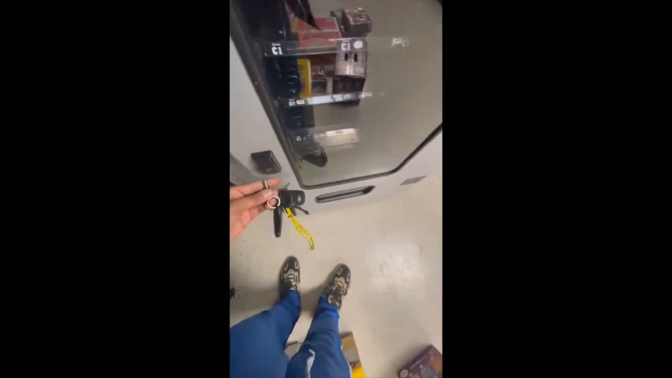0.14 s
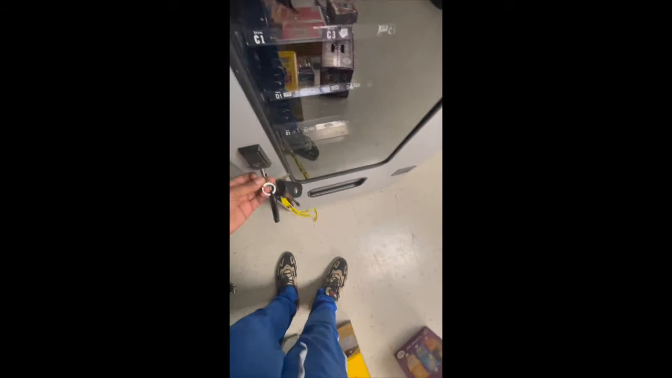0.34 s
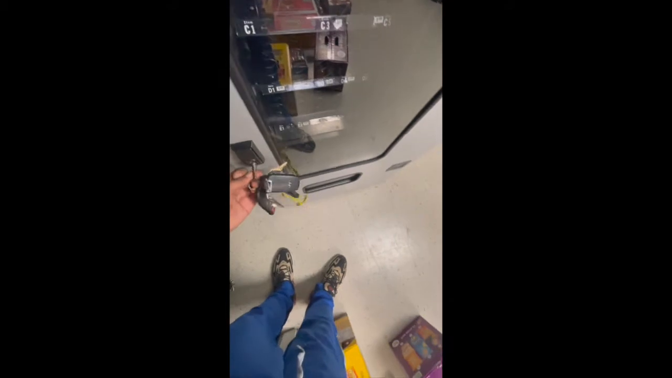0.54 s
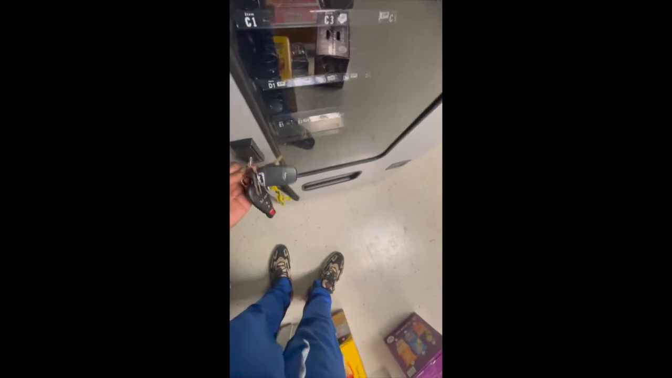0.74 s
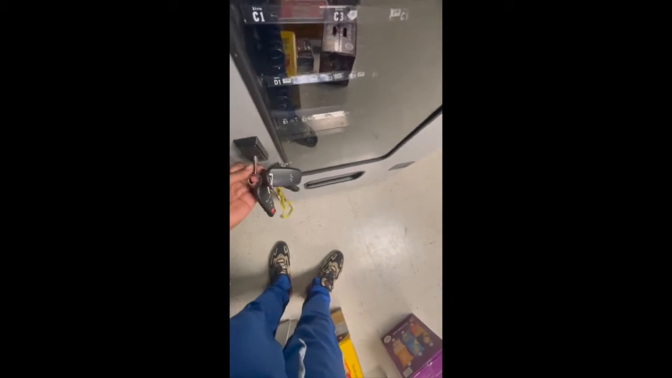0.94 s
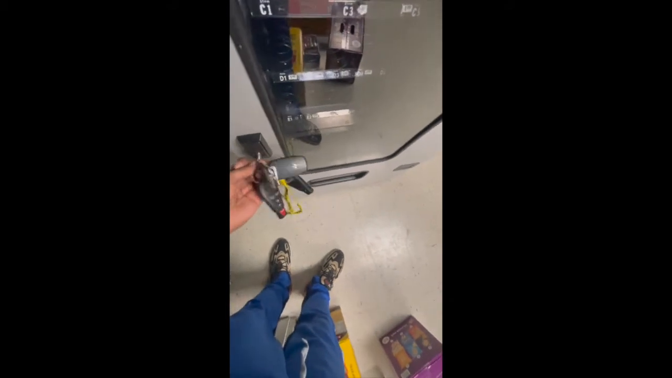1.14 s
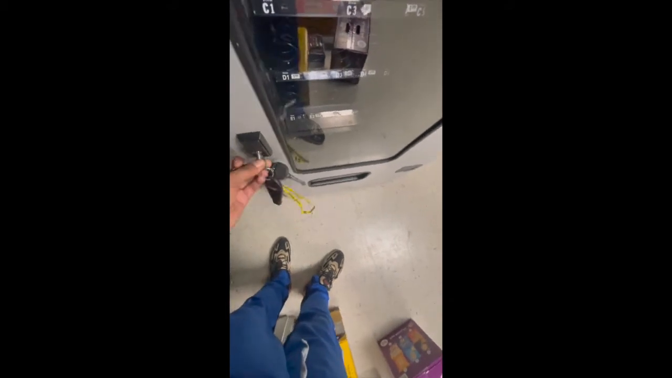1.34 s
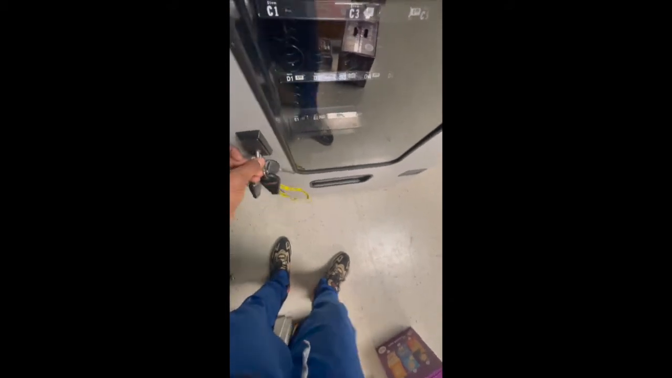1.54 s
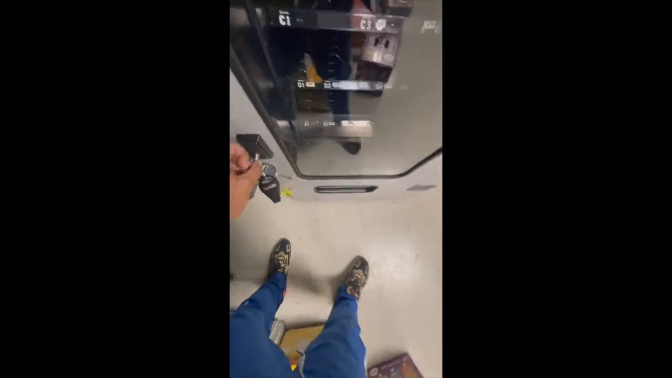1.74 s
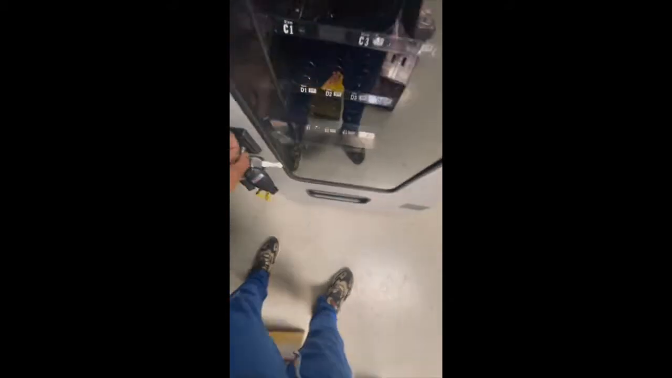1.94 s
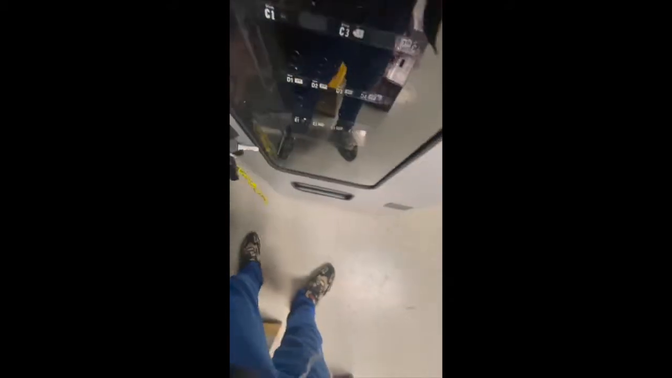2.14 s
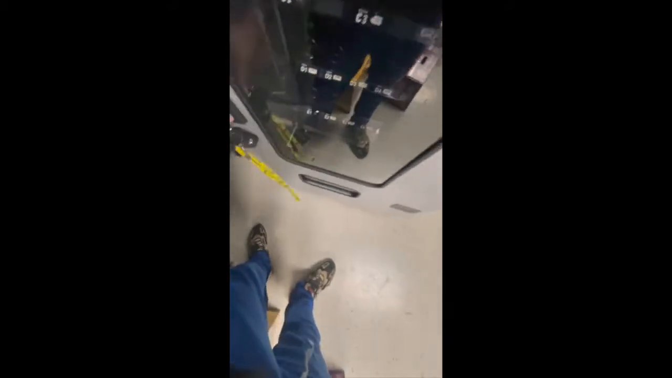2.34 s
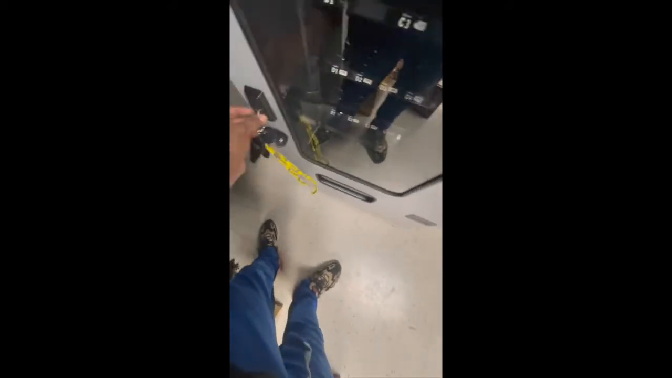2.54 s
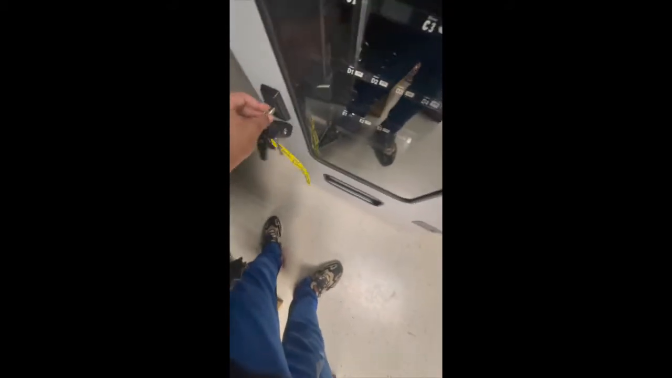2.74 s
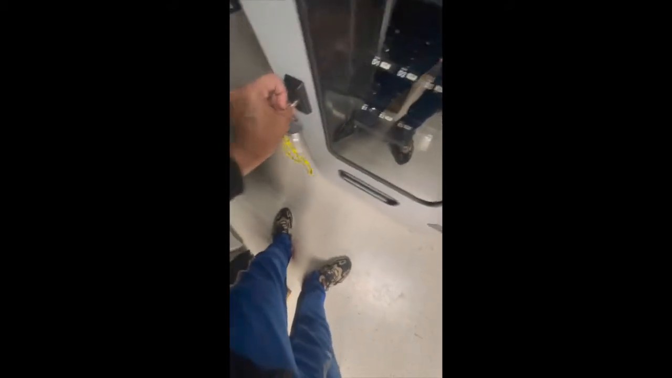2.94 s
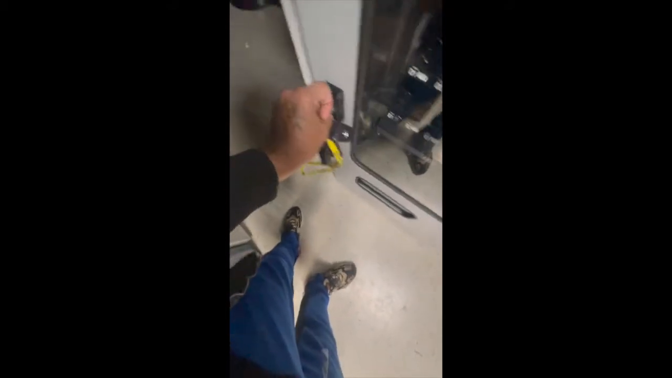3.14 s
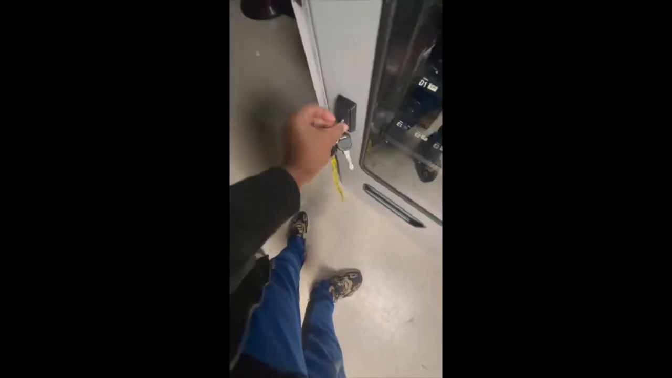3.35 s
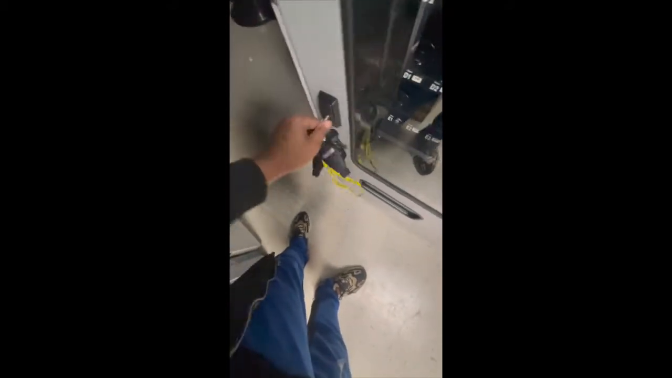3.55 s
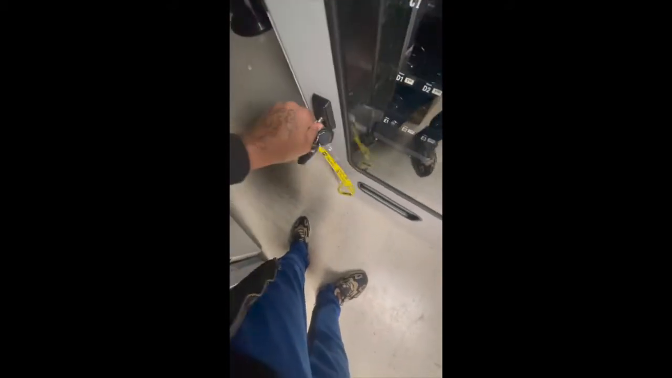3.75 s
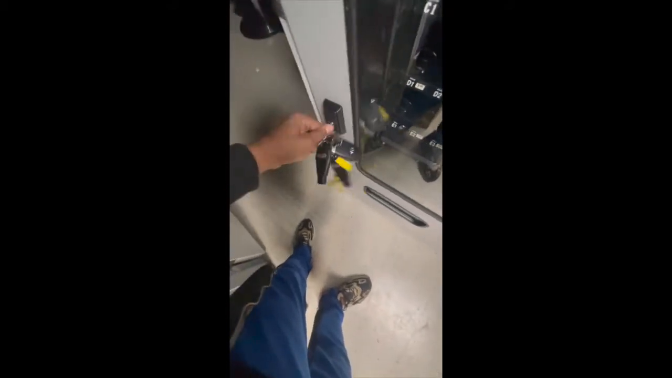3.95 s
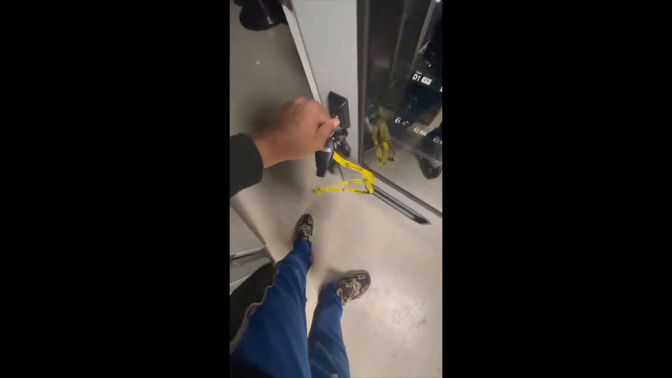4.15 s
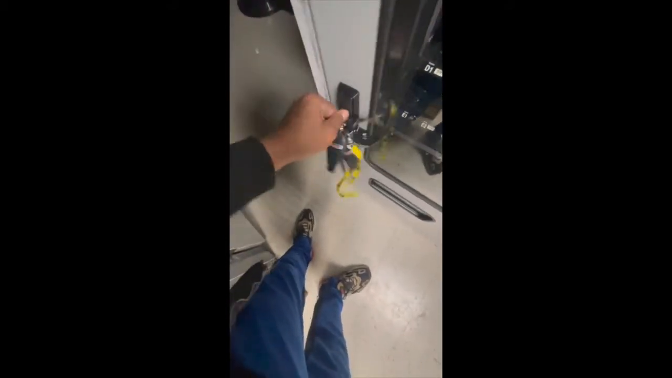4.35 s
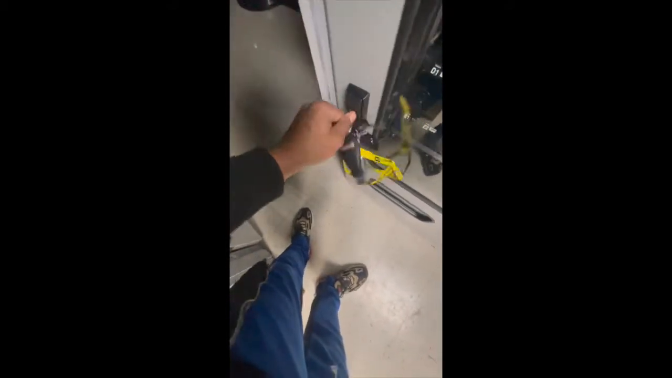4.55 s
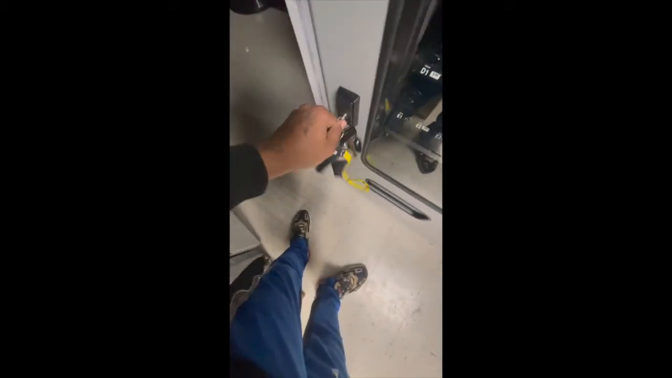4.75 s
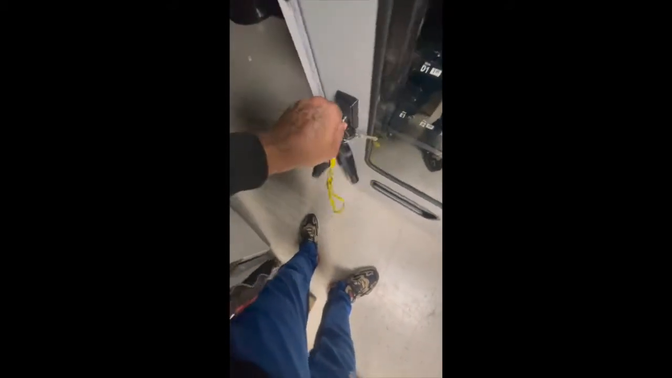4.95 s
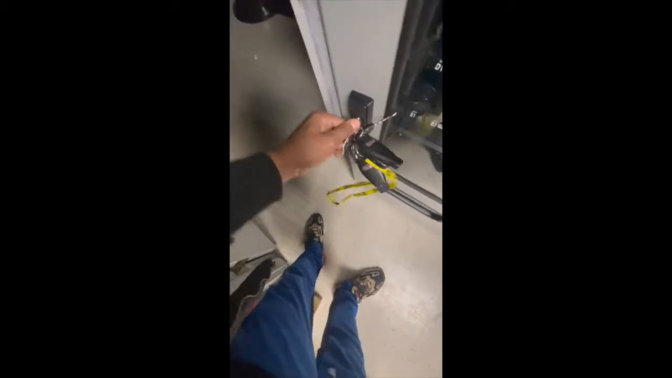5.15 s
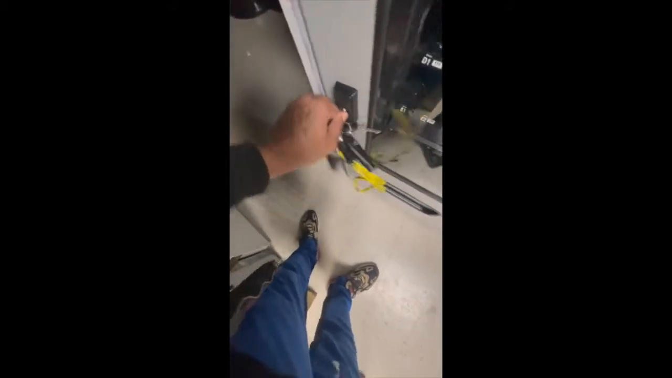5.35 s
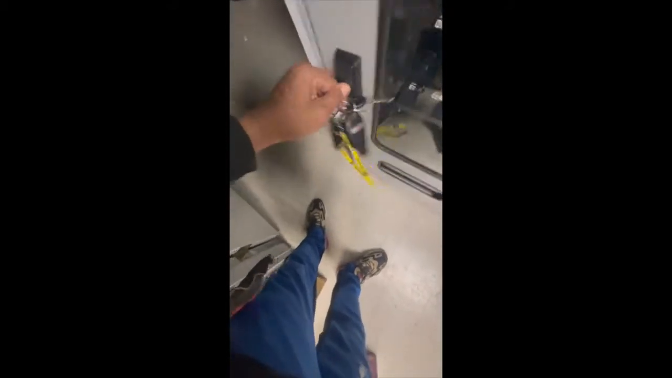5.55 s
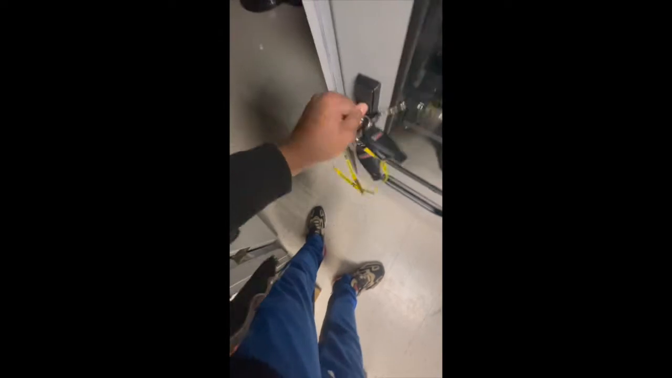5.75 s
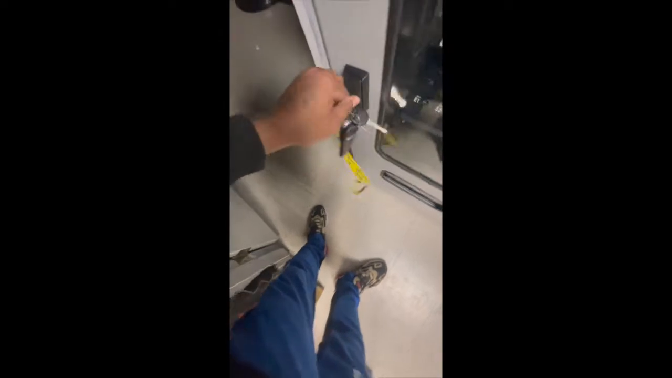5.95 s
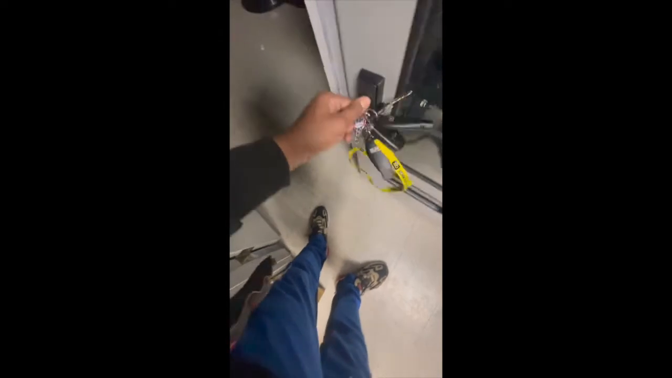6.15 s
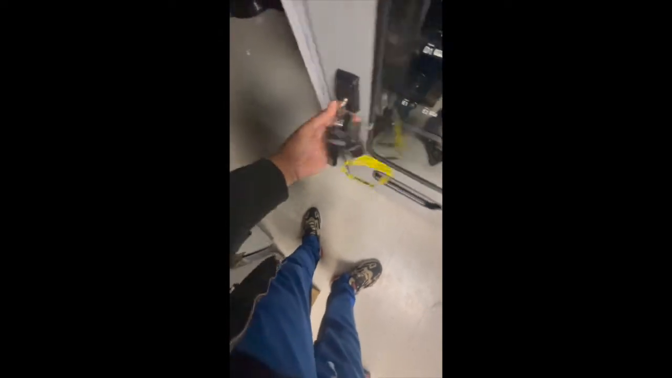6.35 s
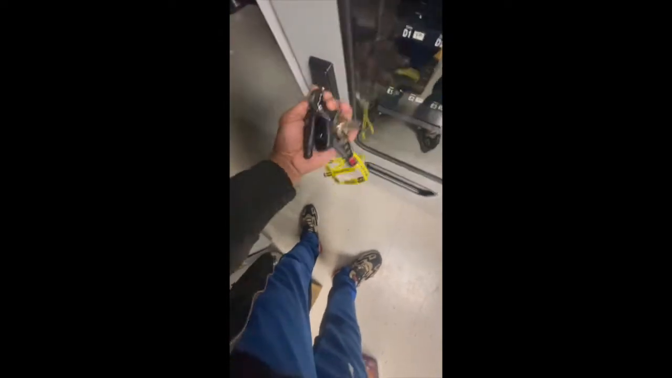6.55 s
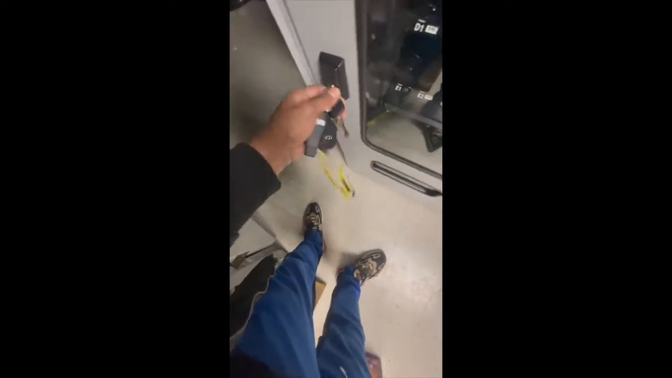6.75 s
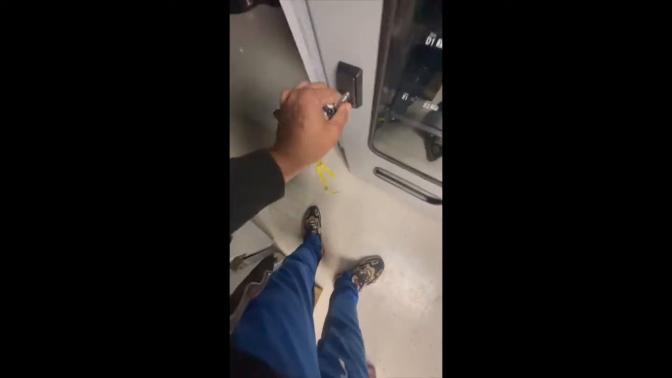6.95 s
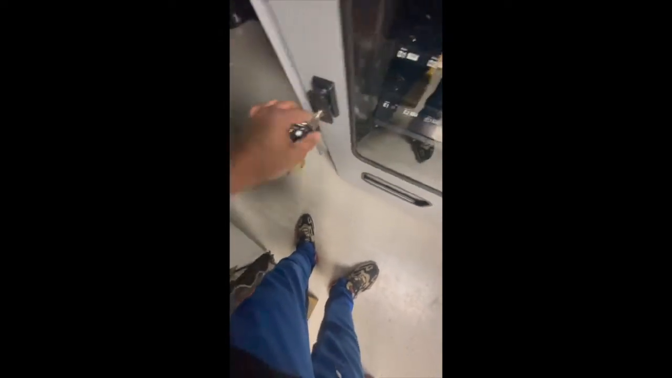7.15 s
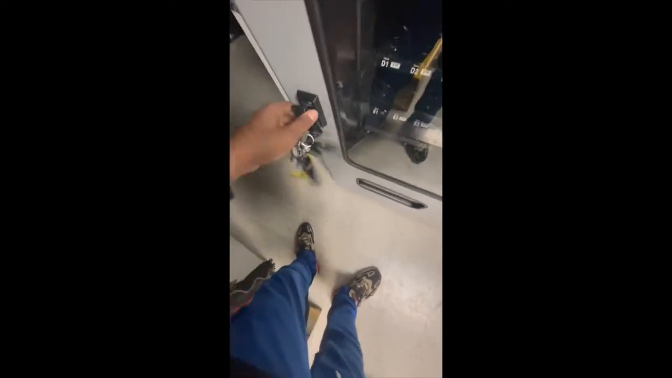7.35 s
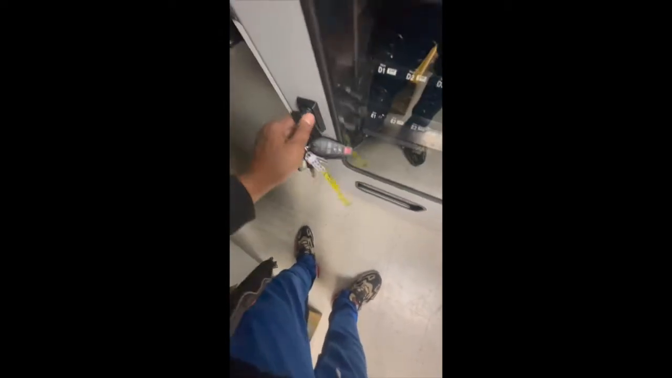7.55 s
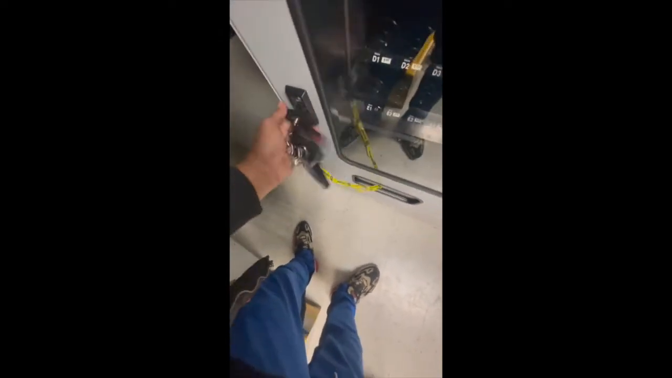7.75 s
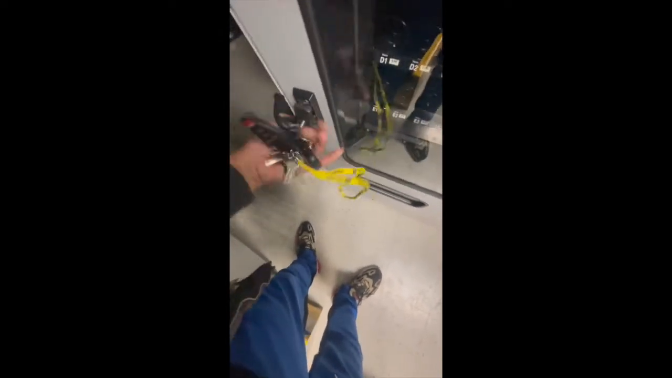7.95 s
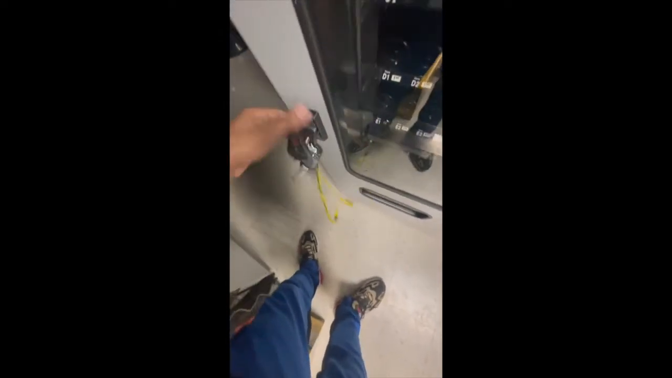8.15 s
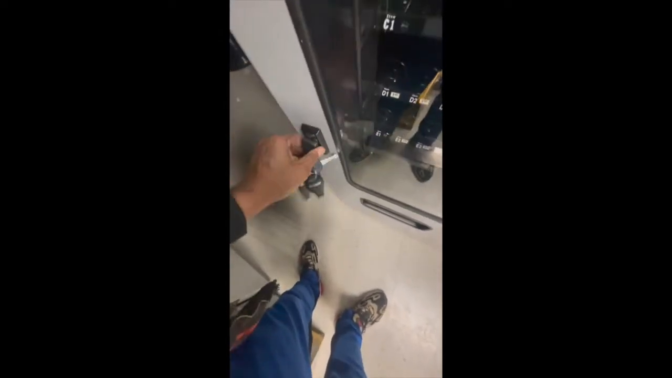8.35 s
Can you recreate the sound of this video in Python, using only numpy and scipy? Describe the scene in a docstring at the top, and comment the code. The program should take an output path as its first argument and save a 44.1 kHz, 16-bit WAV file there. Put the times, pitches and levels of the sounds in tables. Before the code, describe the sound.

A close stereo microphone picks up keys being fitted and turned in the lock of a hollow steel cabinet. Light clinks and faint taps come first, then busier rattles and dull door thumps, two stronger clunks, and finally sharp, bright jingling. A short room echo and steady bass hum surround it.

```python
"""First a light clink of keys over a low hum, then rattles, clacks and booms: a bunch of keys is pushed
into the lock of a vending machine and turned, heard from close by.
Keys are short noise bursts and damped tones; the lock barrel and hollow steel door are resonators
driven by blows and many small contacts; the cabinet is one wandering low tone. Two thin high tones
flicker late on. Decaying noise tails give the room's answer, and uneven coloured noise its hum."""
import sys
import numpy as np
from scipy import signal
from scipy.fft import rfft, irfft, next_fast_len
from scipy.io import wavfile
from scipy.ndimage import uniform_filter1d, map_coordinates

SR = 44100
rng = np.random.default_rng(int(sys.argv[2]) if len(sys.argv) > 2 else 0)


def wrap_up_sound(samples):
    """Save the sound to the file named by the first command line argument, as 16-bit audio."""
    columns = np.atleast_2d(samples).T
    # keep every value between -1 and 1, then stretch to whole-number steps
    tamed = np.clip(columns, -1, 1)
    steps = np.round(tamed * 32767).astype(np.int16)
    wavfile.write(sys.argv[1], SR, steps)


N = 374585
TIME = np.arange(N) / SR

# key contacts: (time [s], nominal clink level [dB], loudest key pitch [Hz],
# bright edge re clink [dB], barrel clack re clink [dB])
CONTACTS = [(0.022, -30, 5470, -7, -37), (0.3981, -28, 2540, -32, -12.5), (0.5896, -35, 2580, -9, -26),
            (0.6851, -22.5, 5350, -2.5, -6.5), (0.713, -19, 3880, -16, -10), (0.9808, -32, 3100, -37, -20),
            (1.083, -38.5, 2800, -28, 2), (1.192, -36.5, 5320, -4, -12), (1.415, -38, 2390, 0, -0.5),
            (1.523, -38.5, 2410, -32, 1.5), (2.021, -32.5, 2610, -21, -2), (2.2689, -24, 3210, -10, -10),
            (2.298, -31.5, 2480, -24, -16), (2.712, -30, 2430, -5, 2), (2.877, -34, 4800, -29, 0.5),
            (3.194, -17.5, 3220, -7, -6.5), (3.373, -24, 3210, -40, -9), (3.411, -33, 3260, 5, 2),
            (3.478, -27.5, 5420, -2, -26), (3.601, -32, 6800, 2, -24), (3.7289,  -28, 2120, -26, -2),
            (3.775, -28, 4400, -23, -21), (3.8383, -26, 2150, -30, -4.5), (3.896, -19.5, 3410, -33.5, -9),
            (3.965, -32, 5700, 6, -25), (4.095, -27, 2270, 1, -1), (4.2043, -19.5, 2400, -22, -12),
            (4.2885, -20, 2860, -34, -7), (4.3891, -27, 5440, 4.5, -31), (4.533, -25.5, 5510, 3.5, -35),
            (4.764, -26.5, 5480, -4, -12.5), (4.948, -25, 5100, -5, -5), (4.9604, -12, 2130, -8.5, -9.5),
            (5.041, -17, 3100, -19, -9), (5.24, -30.5, 5240, 3.5, 1), (5.3887, -42, 1960, -25, 17.5),
            (5.5255, -22.5, 3260, -19, -9), (5.737, -29.5, 1840, -36, 4), (5.8611, -19.5, 3010, -32, -2),
            (5.907, -24, 4970, 1, 1), (5.998, -25.5, 2480, -6, -19), (6.0694, -14, 6450, -3, -10.5),
            (6.195, -34.5, 2110, 10, 3), (6.248, -25.5, 5180, 3.5, -17), (6.2983, -32, 5440, -5, -30),
            (6.355, -30, 3640, 3, -15), (6.468, -28, 3400, 8, -6), (6.5875, -30, 6300, 8.5, -30),
            (6.751, -23.5, 1940, -34, -10.5), (6.9647, -12, 3600, 1, -8.5), (6.97, -6.5, 1960, -15, -16),
            (6.979, -26, 3780, -16, 0), (6.99, -17.5, 3660, -14, 0.5), (7.0844, -29, 3380, -26, 4.5),
            (7.167, -26.5, 1920, -30, -1.5), (7.31, -9, 5400, -6, -31), (7.3595, -10.5, 5650, -7, -39),
            (7.3751, -14.5, 5500, -10, -33), (7.428, -19.5, 5970, 3, -10), (7.453, -22.5, 4260, 2, -10),
            (7.592, -18, 1870, -13, -17), (7.708, -26.5, 3660, 11.5, -5.5), (7.8347, -25, 5100, 4, -36),
            (7.914, -44, 2280, -9, 8), (7.9326, -18.5, 2350, 2, -3.5), (7.961, -20, 5500, 0, -24),
            (7.977, -19.5, 5580, 4, -29), (8.0444, -23, 5650, 0, -6), (8.1096, -12.5, 4430, -19, -6.5),
            (8.154, -22, 5100, 1, -4), (8.199, -28, 2090, 3.5, -25), (8.269, -16, 5600, -7, -14),
            (8.294, -22, 3040, 2, -3), (8.373, -34, 5400, -1, 3)]
# blows on the door: (time [s], nominal panel level [dB], lock plate re panel [dB],
# cabinet boom rms re panel [dB], favoured pitch [Hz])
BLOWS = [(0.398, -31, -20, -21, 241), (0.691, -23.5, -15, -4.5, 212), (0.711, -24, -7.5, -10, 250),
         (0.982, -46.5, 8, -11.0, 240), (1.079, -33, 5.5, -6, 239), (1.522, -33, 1, -26.0, 186),
         (1.749, -32.5, -5.5, -6.0, 170), (1.846, -47.5, 7, -21, 140), (2.096, -46.5, 2.5, -18.0, 180),
         (2.269, -34.5, -7.5, -17, 368), (2.298, -28.5, -35, -21.0, 280), (2.693, -25.5, -12, -2, 241),
         (2.724, -26.5, -11.5, -21, 305), (2.876, -41, 5.5, -15.0, 220), (2.906, -27, -8, -2.5, 150),
         (3.105, -25.0, -20, -12, 255), (3.193, -26, -3, -19.0, 284), (3.229, -34.5, -19.0, 5.5, 310),
         (3.404, -28.5, 1, -13, 253), (3.732, -24.0, -1.5, -15, 234), (3.837, -25.5, -7.5, -10, 243),
         (4.093, -19, -5.5, -9, 294), (4.205, -17.5, -14.5, -4.5, 272), (4.292, -21, -27.0, -8.5, 262),
         (4.55, -25.5, -28, -8.0, 270), (4.586, -24, -15, -27, 322), (4.818, -23.5, -13, -30.0, 270),
         (4.961, -8.5, -19.5, -12.5, 160), (5.039, -10, -24, -14.0, 222), (5.263, -18.5, -16.5, -10, 158),
         (5.396, -15.5, -23, 0, 224), (5.739, -25.5, -10, -16, 334), (5.828, -39.5, -30.0, 19.5, 168),
         (5.861, -22.5, -33.0, -11, 239), (5.985, -22, -32, -24.0, 222), (6.067, -23, -24, -19, 244),
         (6.718, -27.5, -24, -2, 220), (6.747, -21.5, -42, -19.0, 312), (6.963, -14, -35, 0, 327),
         (6.98, -17, -10.5, -22, 280), (6.995, -9.5, -30, -37, 267), (7.038, -20, -34.0, -19.0, 300),
         (7.064, -21.0, -23.0, -23, 297), (7.124, -27.0, -15, -13.0, 220), (7.215, -41, -16, 17.5, 280),
         (7.361, -16.0, -12.5, -22, 380), (7.464, -17, -13.5, -29.0, 190), (7.594, -20.5, -35, 6.5, 179),
         (7.852, -31.5, -33, 8.5, 180), (7.924, -21.5, -23.0, -3, 270), (7.963, -25.5, -22.0, -16, 240),
         (8.105, -21, -25.0, -4, 140), (8.294, -20, -37, 0.5, 244)]
# the hand working the key: (time [s], door shake [dB], barrel grind [dB])
HAND = [(0.0, -55.5, -76), (0.92, -42.5, -61), (1.44, -57.5, -53.5), (1.87, -49, -57), (2.51, -49, -58.5),
        (3.28, -42, -55), (4.28, -47, -52.5), (4.56, -41.5, -79), (5.2, -40.5, -60), (5.89, -37.5, -56),
        (6.69, -44, -66), (6.9, -40.5, -55), (7.23, -35.5, -46), (7.9, -43.5, -72), (8.13, -34.5, -52),
        (8.49, -44.5, -62)]
# body spectrum of a key contact: (frequency [Hz], relative density [dB per Hz])
CLINK_SPECTRUM = [(1200, -1), (2200, 2.5), (4000, 3.5), (6000, 2), (7500, -18), (12000, -39)]
# bright edge of a key contact: (frequency [Hz], relative density [dB per Hz])
EDGE_SPECTRUM = [(4500, -17.5), (6500, 4), (9000, -0.5), (12000, -3.5), (15900, 1), (16200, -39),
                 (17200, -50)]
# resonances of the lock barrel: (frequency [Hz], width [Hz], relative level [dB])
BARREL_MODES = [(1158, 170, 6.5), (1438, 94, 5.5), (1784, 490, -1)]
# resonances of the steel around the lock: (frequency [Hz], width [Hz], relative level [dB])
PLATE_MODES = [(610, 60, 9), (735, 65, 11), (1020, 180, 1)]


def key_contacts():
    """Impact excitation: a short contact has a broad spectrum; bouncing prolongs it and drives the barrel."""
    s, db, _, edge_db, clack_db = np.transpose(CONTACTS)
    bounce = chatter(250, 5.8)
    crack_hit = bursts(s, db + 1.0, 0.0016, size=6)
    crack_bounce = bounce * bursts(s, db - 14.5, 0.064, size=60)
    crack = filtered(crack_hit + crack_bounce, colour(CLINK_SPECTRUM))
    edge_hit = bursts(s, db + edge_db + 5.5, 0.0027)
    edge_bounce = bounce * bursts(s, db + edge_db - 12.0, 0.087, size=60)
    edge = filtered(edge_hit + edge_bounce, colour(EDGE_SPECTRUM))
    clack = filtered(bounce * bursts(s, db + clack_db - 5.5, 0.1, size=60), modes(BARREL_MODES))
    return crack + edge + clack


def key_rings():
    """Free vibration: a struck key rings at its own pitch, and a neighbour answers at another."""
    s, db, hz, _, _ = np.transpose(CONTACTS)
    late, ratio = rng.random((len(s), 2)).T
    struck = pings(s, db - 2.5, hz, t60=0.025, rough=0.19)
    neighbour_hz = hz * (.6 + 1.2 * ratio)
    neighbour = pings(s + .006 * late, db - 6.5, neighbour_hz, t60=0.017, rough=0.18)  # up to 6 ms later
    return struck + neighbour


def key_rattle():
    """Superposed random impacts: shaking sets the level, and harder shaking is brighter."""
    # how hard the bunch of keys is shaken: (time [s], relative rattle level [dB])
    shaking = [(0.0, -45), (0.2, -79), (0.8, -51.5), (1.03, -70), (1.24, -55), (1.37, -62.5), (1.51, -71.5),
               (2.67, -59.5), (3.22, -61.5), (3.45, -52.5), (4.66, -50), (4.94, -50), (5.56, -50),
               (5.82, -56), (6.22, -44.5), (6.41, -38.5), (6.6, -56), (6.83, -53.5), (7.4, -46), (7.8, -46),
               (8.06, -33), (8.16, -37.5), (8.39, -41.5), (8.49, -50.5)]
    s, db = np.transpose(CONTACTS)[:2]
    after_db, after_s = -29.5, 0.079  # shaking left by a clink: level re clink, t60
    shake = curve(shaking, column=1) + dying(s, db + after_db, after_s, size=400)
    contacts = chatter(45, 5.5) * crowd(450, 3.6, 0.003)
    rattle = amp(-4.5) * filtered(contacts, colour(CLINK_SPECTRUM))
    rattle += amp(11.5) * shake ** 0.29 * filtered(contacts, colour(EDGE_SPECTRUM))
    return shake * (rattle + amp(-5.0) * jangle(count=1800))


def jangle(count):
    """Modal excitation: small random contacts each ring one mode of one key."""
    # key modes: (frequency [Hz], relative level [dB], t60 [s])
    key_modes = [(3643, -1, 0.085), (5640, 5.5, 0.073), (6450, -1, 0.024), (9300, 0.5, 0.027),
                 (10360, 1.5, 0.036)]
    when, which, size, off = rng.random((count, 4)).T
    hz, db, t60 = np.array(key_modes)[(which * len(key_modes)).astype(int)].T
    pitch_hz = hz * (1 + .14 * (off - .5))  # within 7 percent of the mode
    return unit(pings(when * TIME[-1], db + 14 * size, pitch_hz, t60[:, None], rough=0.16))


def thin_tones():
    """Thin flickering tones: two brief high tones of wandering phase swell and stop."""
    # thin high tones: (time [s], pitch [Hz], relative level [dB], time scale of the swell [s])
    tones = [(7.826, 7550, -22, .022), (8.363, 7700, -27, .02)]
    out, t = np.zeros(N + SR), TIME[:SR // 10]
    for s, hz, db, length in tones:
        u = t / length
        swell = u * np.exp(-u * u * u)
        drift = 0.025 * np.cumsum(rng.standard_normal(len(t)))  # phase [rad]
        out[round(s * SR):][:len(t)] += amp(db + 11.5) * swell * np.sin(2 * np.pi * hz * t + drift)
    return out[:N] * chatter(180, 4.0)


def barrel_grind():
    """Forced resonance: many small contacts of the turning key drive the barrel and lock plate."""
    after_db = -45  # grind after a blow, re door shake
    effort = curve(HAND, column=2) + amp(after_db) * aftershake()

    def response(hz):
        return modes(PLATE_MODES + BARREL_MODES)(hz) / (1 + 1j * hz / 1500) ** 2

    return effort * filtered(crowd(250, 3.5, 0.03), response)


def door():
    """Modal excitation: blows and the hand shake panel and plate; the blow's place favours some modes."""
    # door panel resonances: (frequency [Hz], width [Hz], relative level [dB])
    panel_modes = [(146.7, 54, -1.5), (216, 47, -1.5), (272.3, 51, 0), (369, 65, -4), (439, 99, -4.5)]
    favour_db = 12  # loss per octave away from the favoured pitch
    s, db, plate_db, _, favoured_hz = np.transpose(BLOWS)

    def soft(hz):
        return 1 / (1 + 1j * hz / 2500) ** 2  # blunt blows carry little treble

    shaking = (curve(HAND, column=1) + aftershake()) * crowd(80, 4.0, 0.042)
    grain, panel = rng.standard_normal(N), 0
    for k, (hz, width, mode_db) in enumerate(panel_modes):
        share_db = db - favour_db * abs(np.log2(hz / favoured_hz))
        thump = dying(s, share_db + 8.5, 0.0012, size=20)
        rumble = dying(s, share_db, 0.11, size=90) * grain
        resonator = signal.iirpeak(hz, hz / width, SR)
        ringing = signal.lfilter(*resonator, thump + rumble + shaking)
        panel = panel + (-1) ** k * amp(mode_db + 11) * ringing
    tap = bursts(s, db + plate_db - 1, 0.11) + dying(s, db + plate_db + 11, 0.001, size=20)
    return filtered(panel, soft) + filtered(tap, lambda hz: modes(PLATE_MODES)(hz) * soft(hz))


def aftershake():
    """Damped vibration: gain of the shaking that each blow leaves in the door."""
    s, db = np.transpose(BLOWS)[:2]
    return dying(s, db - 15, 0.12, size=900)


def cabinet():
    """Cavity resonance: blows kick one low mode of straying pitch; the shaking door keeps it murmuring."""
    boom_hz, boom_wander_hz = 59, 11  # centre and rms deviation
    boom_s, boom_lag_s = .16, 0.0024  # t60 and delay after the blow
    murmur_db = -1  # re door shake
    s, db, _, boom_db, _ = np.transpose(BLOWS)
    wander = unit(uniform_filter1d(rng.standard_normal(N), size=1600))
    boom = dying(s + boom_lag_s, db + boom_db, boom_s, size=900)
    murmur = curve(HAND, column=1) * amp(murmur_db) * chatter(8.2, 3.7)
    phase = 2 * np.pi * np.cumsum(boom_hz + boom_wander_hz * wander) / SR
    return np.sqrt(2) * (boom + murmur) * np.sin(phase)


def walls(x):
    """Reverberation: two unrelated tails in which each frequency dies at its own speed."""
    # reverberation time of the room: (frequency [Hz], t60 [s])
    decay = [(150, 0.66), (1000, 0.27), (10000, 0.13)]
    hz, t, z = signal.stft(rng.standard_normal((2, SR // 2)), SR, nperseg=256)
    fade = amp(-60 * t / along(decay, hz)[:, None])
    tail = signal.istft(z * fade, SR, nperseg=256)[1]
    return signal.fftconvolve(x[None], tail / np.linalg.norm(tail[0]), axes=1)[:, :N]


def room_hum():
    """Stationary noise with a slow random gain: its spectrum is strongest in the bass."""
    # spectrum of the hum: (frequency [Hz], relative density [dB per Hz])
    hum_spectrum = [(25, -50), (50, -5), (250, -12.5), (1000, -66.5), (2000, -40.5), (5500, -45),
                    (7000, -60.5), (16000, -65)]
    return amp(-41.5) * chatter(4.4, 1.4) * filtered(patchy(depth_db=3), colour(hum_spectrum))


def patchy(depth_db):
    """Time-frequency modulation: two noises whose bands swell and thin out unevenly together."""
    z = signal.stft(rng.standard_normal((2, N)), nperseg=512)[2]
    field = uniform_filter1d(rng.standard_normal(z.shape[1:]), size=12, axis=0)  # across frequency
    field = uniform_filter1d(field, size=16, axis=1)  # across time
    return unit(signal.istft(z * amp(depth_db * unit(field)), nperseg=512)[1][:, :N])


def pings(times, db, hz, t60, rough):
    """Damped oscillation: one tone of wandering phase per contact, cut off after 20 ms."""
    t = np.arange(SR // 50) / SR
    wander = rough * np.cumsum(rng.standard_normal((len(times), len(t))), axis=1)
    tone = amp(db[:, None] - 60 * t / t60) * np.sin(2 * np.pi * hz[:, None] * t + wander)
    at = np.round(times * SR).astype(int)[:, None] + np.arange(len(t))
    return np.bincount(at.ravel(), tone.ravel(), N + SR)[:N]


def chatter(rate_hz, depth_db):
    """Amplitude modulation: a random gain of rms 1."""
    knots = rng.standard_normal(int(N * rate_hz / SR) + 4)
    return unit(amp(depth_db * map_coordinates(knots, [TIME * rate_hz], order=1)))


def crowd(rate_hz, spread_db, t60):
    """Poisson-like impacts: small contacts at random times and sizes, rms 1."""
    hit = rng.random(N) < rate_hz / SR
    size_db = spread_db * np.minimum(rng.exponential(size=N), 3)
    return unit(bursts(TIME[hit], size_db[hit], t60))


def bursts(times, db, t60, size=20):
    """Broadband excitation: noise under a dying envelope."""
    return dying(times, db, t60, size) * rng.standard_normal(N)


def dying(times, db, t60, size):
    """Exponential decay: an envelope rises over size samples at each time and dies in t60."""
    at = np.clip(np.round(times * SR).astype(int), 0, N - 1)
    jumps = np.bincount(at, amp(db), N)
    decay = signal.lfilter([1], [1, -amp(-60 / (t60 * SR))], jumps)
    return uniform_filter1d(decay, size, origin=(size - 1) // 2)


def curve(rows, column):
    """Level interpolation: gain of one dB column at every sample."""
    rows = np.array(rows)
    return amp(np.interp(TIME, rows[:, 0], rows[:, column]))


def modes(table):
    """Modal superposition: causal response of (frequency [Hz], width [Hz], level [dB]) resonances."""
    def response(f):
        total = 0
        for k, (c, w, db) in enumerate(table):
            total = total + (-1) ** k * amp(db) * 1j * f * w / (c * c - f * f + 1j * f * w)
        return total
    return response


def colour(spectrum):
    """Spectral shaping: response of (frequency [Hz], level [dB]) points."""
    return lambda hz: amp(along(spectrum, hz))


def filtered(x, response):
    """Linear filtering: a complex frequency response, scaled to keep the power of white noise."""
    m = next_fast_len(N + SR // 2)
    gain = response(np.fft.rfftfreq(m, 1 / SR))
    return irfft(rfft(x, m) * gain / np.sqrt(np.mean(abs(gain) ** 2)), m)[..., :N]


def along(points, hz):
    """Logarithmic frequency scale: interpolates (frequency [Hz], value) points."""
    f, v = np.transpose(points)
    return np.interp(np.log(hz + 1), np.log(f + 1), v)


def amp(db):
    """Decibel law: level to amplitude."""
    return 10 ** (np.asarray(db) / 20)


def unit(x):
    """Power normalisation: scales x to rms 1."""
    return x / np.sqrt(np.mean(x ** 2) + 1e-20)


def scene():
    """Superposition of near sound, room and hum; the second row is what differs between the ports."""
    bunch = key_contacts() + key_rings() + key_rattle() + barrel_grind() + thin_tones()
    body = door() + cabinet()
    near = bunch + body
    # random phases in short frames make a diffuse sound unlike the near one
    z = signal.stft(near, nperseg=128)[2]
    random_phase = np.exp(2j * np.pi * rng.random(z.shape))
    diffuse = 1.4 * signal.istft(z * random_phase, nperseg=128)[1][:N]
    body_echo = amp(-6.0) * walls(body)
    bunch_echo = amp(-8.5) * chatter(300, 3.2) * walls(bunch)  # a fast random gain roughens the echo
    return np.array([near, diffuse]) + body_echo + bunch_echo + room_hum()


def record(dry):
    """Stereo coherence: two close ports, partly alike, shifted in phase, bass folded to mono."""
    # two ports with unequal paths: (frequency [Hz], phase by which left leads [rad])
    lead = [(300, -.7), (900, -.9), (2600, .9), (5500, 1), (7400, 3.1), (11000, 6.3), (14000, 9.5),
            (17000, 10.5)]
    # likeness of left and right before the bass fold: (frequency [Hz], coherence [-1 to 1])
    alike = [(330, .8), (800, .8), (1500, .78), (4000, .78), (9000, .9), (15000, .92)]
    # drifting edge below which the bass sits in the centre: (time [s], edge [Hz])
    mono = [(0, 400), (.6, 670), (1.6, 780), (2.2, 670), (3.5, 920), (4.3, 670), (4.8, 332), (8.49, 323)]
    top_hz = 17140
    dry = .8 * np.tanh(dry / .8)  # loud peaks saturate softly
    m = next_fast_len(N + SR // 2)
    hz = np.fft.rfftfreq(m, 1 / SR)
    turn = np.arccos(np.clip(along(alike, hz), -1, 1)) / 2
    shift = np.exp(.5j * np.interp(hz, *np.transpose(lead)))
    bass_cut = 1 - 1 / (1 + (hz / 43) ** 8)
    common, differing = rfft(dry, m) * [np.cos(turn), np.sin(turn)] * (hz < top_hz) * bass_cut
    ports = np.array([(common + differing) * shift, (common - differing) / shift])
    left, right = irfft(ports, m)[:, :N]
    mid = (left + right) / 2
    f, t, z = signal.stft((left - right) / 2, SR, nperseg=2048)
    edge_hz = np.interp(t, *np.transpose(mono))
    side_gain = 1.02 - 1 / (1 + (f[:, None] / edge_hz) ** 10)  # a trace of side stays in the bass
    side = signal.istft(z * side_gain, nperseg=2048)[1][:N]
    return np.array([mid + side, mid - side])


dry = scene()
out = record(dry)
wrap_up_sound(out)
```